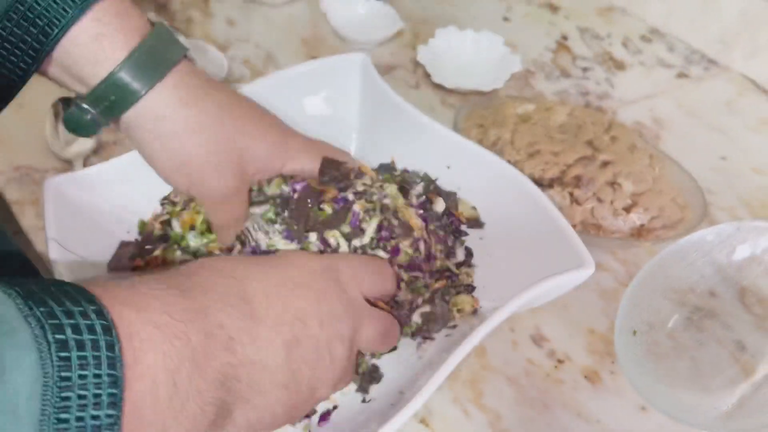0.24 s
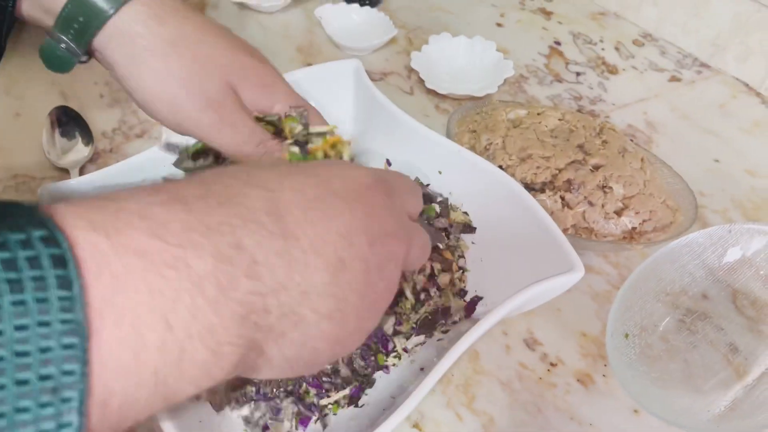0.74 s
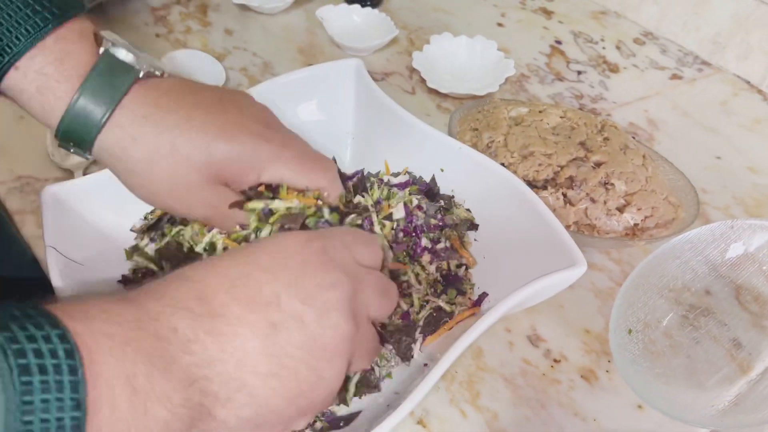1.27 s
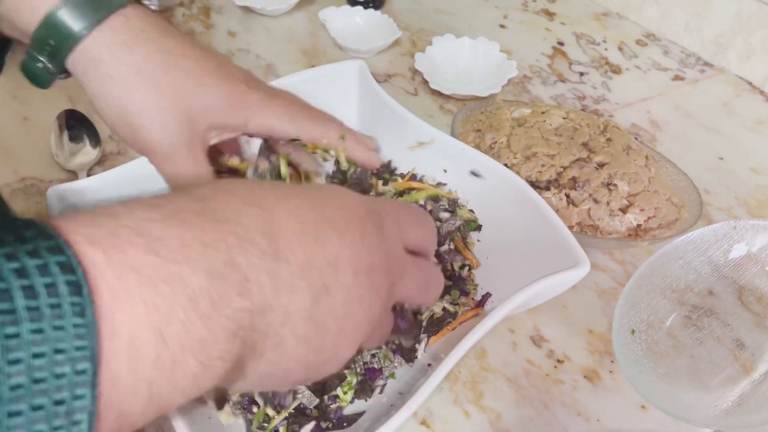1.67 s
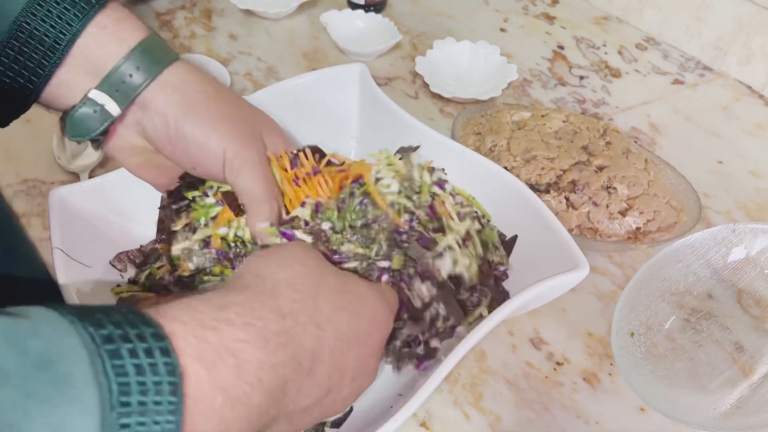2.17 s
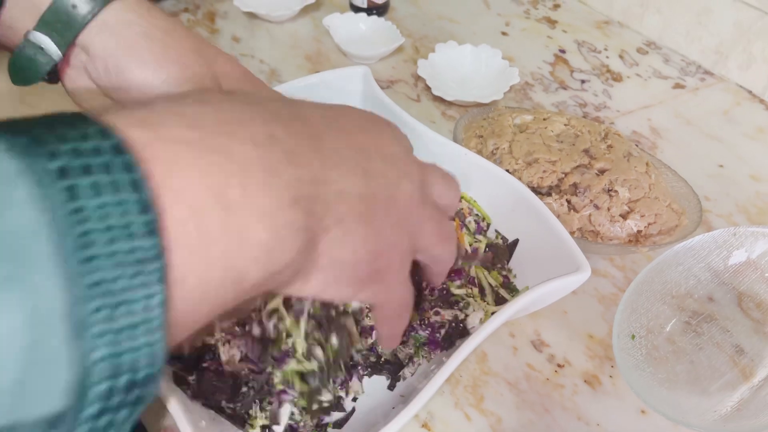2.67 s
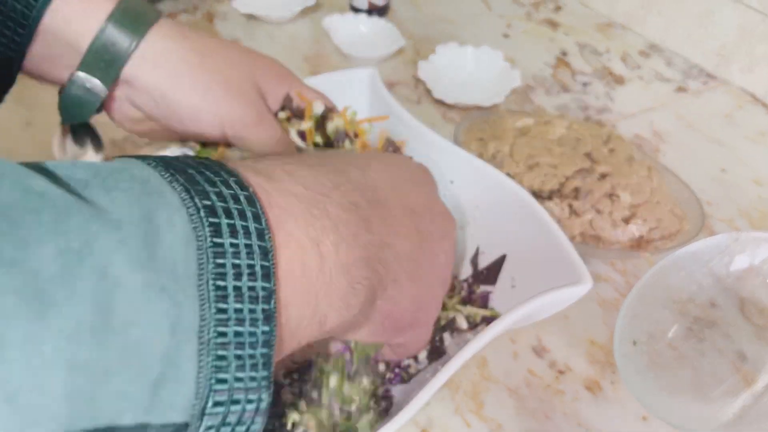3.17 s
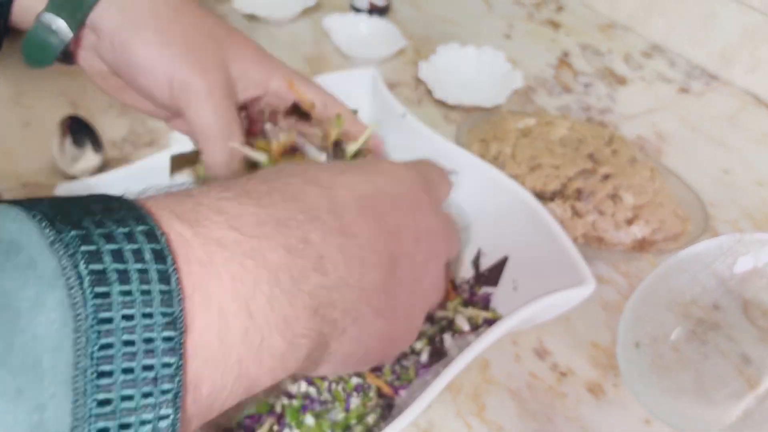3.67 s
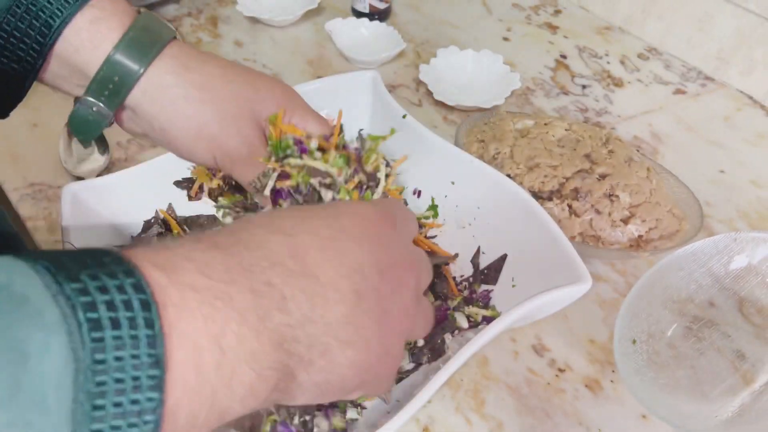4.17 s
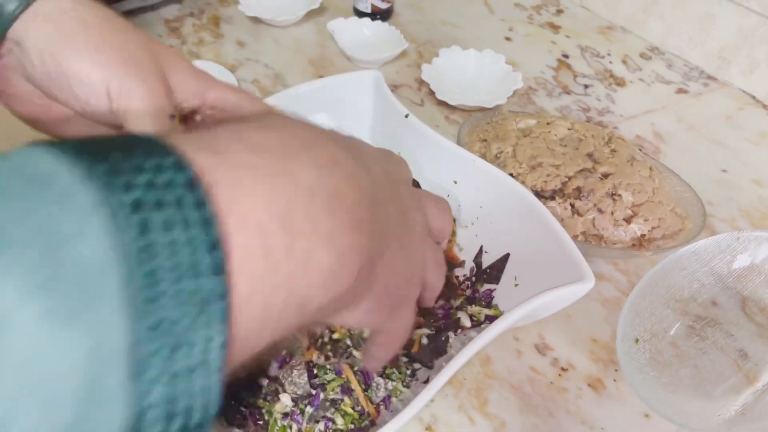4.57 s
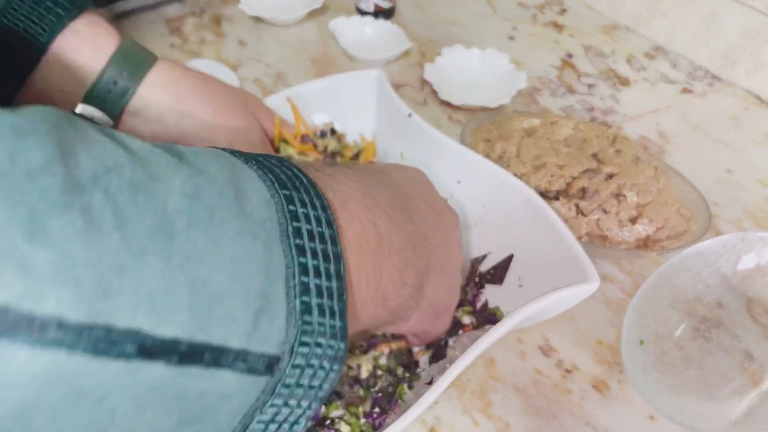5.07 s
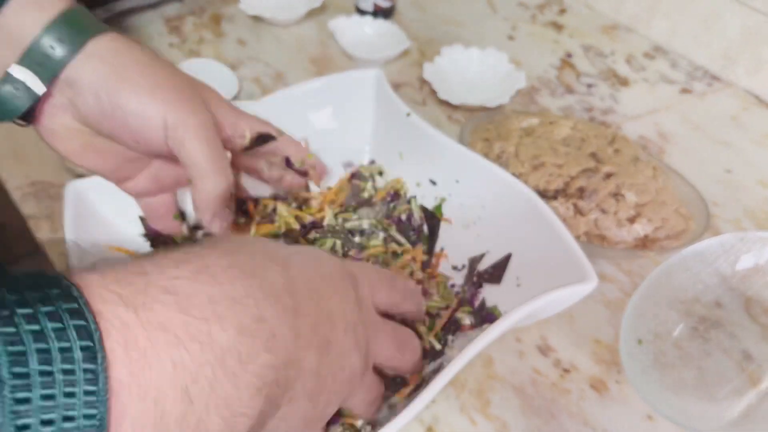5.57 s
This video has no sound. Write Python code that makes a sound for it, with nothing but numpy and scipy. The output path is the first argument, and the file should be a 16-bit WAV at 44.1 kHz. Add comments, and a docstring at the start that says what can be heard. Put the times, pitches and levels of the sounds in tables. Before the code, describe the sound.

Hands toss shredded raw vegetables in a large ceramic bowl, with soft crisp rustling and dull bowl knocks booming on a kitchen counter.

```python
"""A brush of shredded vegetables over the dying boom of an earlier knock comes first, then hands toss them
in a large ceramic bowl. It rocks on its foot: landings ring modes of counter and bowl and boom into the kitchen.
The rim clinks once and is softly tapped; a wet finger squeaks faintly on the glaze.
Rustle, shuffle and rumble are coloured noise that follows the hands; snapping shreds are short noise cracks.
A pair of small microphones hears it, alike in the bass and in a resonant treble band."""
import sys
import numpy as np
from scipy import signal
from scipy.fft import rfft, irfft, next_fast_len
from scipy.io import wavfile

SR = 44100
rng = np.random.default_rng(int(sys.argv[2]) if len(sys.argv) > 2 else 0)


def wav_record(signal):
    """Record a signal, one row per channel, as 16-bit PCM in the file named by sys.argv[1]."""
    frames = np.transpose(np.atleast_2d(signal))
    bounded = np.clip(frames, -1, 1)
    # unit amplitude maps onto the largest positive 16-bit level
    quanta = np.round(bounded * 32767).astype(np.int16)
    wavfile.write(sys.argv[1], SR, quanta)


def ratio_of_db(decibels):
    """Turn decibels (scalar or array-like) into linear amplitude factors; 0 dB maps to 1."""
    return 10 ** (np.asarray(decibels, float) / 20)


N = 256662   # length [samples]


def rms_one(x):
    """Scale to rms 1."""
    return x / np.sqrt(np.mean(x ** 2) + 1e-20)


def at_hz(points, hz):
    """Read a curve on a log-frequency axis."""
    points = np.array(points)
    return np.interp(np.log(hz + 1), np.log(points[:, 0] + 1), points[:, 1])


def coloured(x, spectrum):
    """Give a steady texture its spectrum; rms 1."""
    hz = np.arange(N // 2 + 1) * SR / N
    return rms_one(irfft(rfft(x) * ratio_of_db(at_hz(spectrum, hz)), N))


def drift(rate_hz):
    """Slow chance of spread 1: noise through two equal one-pole low-passes, made at every 40th sample."""
    r = np.exp(-80 * np.pi * rate_hz / SR)
    white = rng.standard_normal(N // 40 + 2002)
    slow = signal.lfilter([1], [1, -2 * r, r * r], white)[2000:]
    return np.interp(np.arange(N) / 40, np.arange(len(slow)), rms_one(slow))


def ring(clicks, hz, t60):
    """A unit click sets a sine of height 1 ringing; it falls 60 dB in t60 seconds."""
    r, w = ratio_of_db(-60 / (t60 * SR)), 2 * np.pi * hz / SR
    return signal.lfilter([0, np.sin(w)], [1, -2 * r * np.cos(w), r * r], clicks + 1e-18)


def dying(energy, t60):
    """Energy that falls 60 dB in t60 seconds."""
    return signal.lfilter([1], [1, -ratio_of_db(-120 / (t60 * SR))], energy)


def strike(at, heights):
    """Click train: heights at sample positions."""
    clicks = np.zeros(N)
    np.add.at(clicks, at.ravel(), heights.ravel())
    return clicks


def half_octaves():
    """(centre [Hz], band-pass) from the boom to the treble."""
    edges = 40 * 2 ** np.arange(0, 8.6, .5)
    return [(np.sqrt(low * high), signal.butter(2, [low, high], "band", fs=SR, output="sos"))
            for low, high in zip(edges, edges[1:])]


# The hands at work; only the swing of the pressure about its mean is used:
# (time [s], stirring of the shreds [relative dB], pressure on the bowl [relative dB])
TOSSING = [(0.0, -54.5, -52), (.31, -58, -64), (.52, -62.5, -56.5), (.82, -62.5, -58.5), (1.06, -55.5, -63),
           (1.2, -63.5, -71.5), (1.4, -67, -61.5), (1.62, -63, -56), (1.7, -56.5, -56), (1.95, -60, -55.5),
           (2.25, -69.5, -58), (2.46, -68, -65.5), (2.66, -56, -57), (3.0, -65, -49.5), (3.25, -64, -56),
           (3.35, -59.5, -49), (3.45, -64.5, -61.5), (3.55, -66.5, -58), (3.7, -59, -55.5),
           (3.89, -59, -55.5), (4.0, -68, -68), (4.15, -62.5, -63.5), (4.3, -65, -56.5), (4.55, -64, -57),
           (5.0, -66, -67.5), (5.28, -66.5, -55), (5.56, -59, -57), (5.82, -65.5, -54)]


def tossing():
    """Stirring level and swing in hand pressure [dB], drawn out sample by sample."""
    s, stir_db, press_db = np.transpose(TOSSING)
    t = np.arange(N) / SR
    press_db = np.interp(t, s, press_db)
    return np.interp(t, s, stir_db), press_db - press_db.mean()


# The heap slides after a knock; rows are rustle, shuffle, rumble:
# (peak level against the knock [dB], time to swell [s])
HEAP_SETTLING = [(-41, 0.062), (-33, 0.046), (-24.5, 0.052)]


def heap_gain(steady_db, layer):
    """Power of the tossing plus what each knock shakes loose: it peaks after the swell time, then fades."""
    level_db, swell_s = HEAP_SETTLING[layer]
    s, _, knock_db = np.transpose(KNOCKS)[:3]
    r = np.exp(-1 / (swell_s * SR))
    shaken = strike((s * SR).astype(int), ratio_of_db(2 * (knock_db + level_db))) + 1e-18
    loose = signal.lfilter([np.e * (1 - r)], [1, -2 * r, r * r], shaken)
    return np.sqrt(ratio_of_db(2 * steady_db) + loose)


# Spectrum of the low rumble: (frequency [Hz], relative density [dB per Hz])
RUMBLE_COLOUR = [(18, -43), (30, -29), (49, -1.5), (81, -1), (150, -3.5), (214, -11), (294, -5),
                 (395, -11.5), (500, -6), (650, -45), (1100, -120)]


def rumble(swing_db):
    """The pressed bowl rumbles: unsteady low noise that follows a share of the swing in pressure."""
    unsteady = rng.standard_normal((2, N)) * ratio_of_db(4.5 * drift(8))
    return heap_gain(-59.5 + 0.38 * swing_db, layer=2) * coloured(unsteady, RUMBLE_COLOUR)


def shreds(median_per_s, spread_db, smooth, flutter_db):
    """Countless tiny breaks and slips in clumps, on the smoother hiss that the room makes of them."""
    sizes = ratio_of_db(spread_db * np.minimum(rng.exponential(1, (2, N)), 5)) * rng.choice([-1, 1], (2, N))
    born = rng.random(N) < median_per_s * ratio_of_db(5 * drift(20)) / SR
    grains = rms_one(sizes * born) + smooth * rng.standard_normal((2, N))
    return grains * ratio_of_db(flutter_db * (drift(12.3) + drift(9.6)))


# Spectrum of the shuffling heap: (frequency [Hz], relative density [dB per Hz])
SHUFFLE_COLOUR = [(180, -45.5), (300, -2.5), (541, -19), (795, -3), (1100, -9), (1210, -6.5), (1430, -13),
                  (2150, -8.5), (2580, -18), (4500, -26.5), (5850, -50), (9900, -120)]


def shuffle(swing_db):
    """The heap shuffles in the bowl: mid-range grains that follow the swing in pressure."""
    grains = shreds(median_per_s=540, spread_db=2.0, smooth=2.0, flutter_db=2.5)
    return heap_gain(-58.5 + 1.05 * swing_db, layer=1) * coloured(grains, SHUFFLE_COLOUR)


# Spectrum of the rustling shreds: (frequency [Hz], relative density [dB per Hz])
RUSTLE_COLOUR = [(1470, -33.5), (2500, -2), (2910, -2), (3300, -3.5), (4440, -1.5), (7200, -7.5),
                 (9110, -2.5), (10000, -1), (11300, -3), (13100, -24)]


def rustle(stir_db):
    """Stirred shreds rub and rustle: dense bright grains that follow the stirring."""
    grains = shreds(median_per_s=1800, spread_db=0.5, smooth=0.91, flutter_db=0.78)
    return heap_gain(stir_db + 5.5, layer=0) * coloured(grains, RUSTLE_COLOUR)


# A wet finger slips on the glaze:
# (time [s], length [s], start frequency [Hz], rise [Hz per s], level before the room [dB])
FINGER_SLIPS = [(1.355, 0.16, 4540, 1200, -75), (1.526, .08, 4540, 2980, -70), (1.615, .05, 4640, 500, -74)]


def squeak(wobble_hz):
    """A finger slips on the glaze: faint wavering sines that swell, climb and fade."""
    t, out = np.arange(N) / SR, 0
    wobble, flutter = wobble_hz * drift(38), ratio_of_db(3 * drift(30))
    for s, length, hz, rise, level_db in FINGER_SLIPS:
        since = np.clip(t - s, 0, length)
        swell = np.sqrt(np.abs(np.sin(np.pi * since / length)))
        cycles = np.cumsum(hz + rise * since + wobble) / SR
        out = out + ratio_of_db(level_db) * swell * np.sin(2 * np.pi * cycles)
    return np.sqrt(2) * flutter * out


# Shreds that snap: (time [s], peak before the microphones [dB], centre frequency [Hz])
SHRED_SNAPS = [(0.274, -32, 8890), (0.312, -26.5, 11300), (0.5423, -36, 11500), (1.098, -29.5, 11200),
               (1.222, -37, 8460), (1.2974, -46, 8930), (1.4666, -41, 3480), (2.365, -36.5, 11400),
               (3.2858, -65, 11100), (3.7344, -58, 4790), (4.049, -39, 11600), (4.4357, -42, 4630),
               (5.1227, -54, 10900)]


def snaps(decay_s, width):
    """A crisp shred breaks: a crack of noise some milliseconds long, around its centre frequency."""
    out, t = np.zeros((2, N)), np.arange(600) / SR
    for s, peak_db, hz in SHRED_SNAPS:
        edges = [hz / width, min(hz * width, .45 * SR)]
        band = signal.butter(1, edges, "band", fs=SR, output="sos")
        crack = signal.sosfilt(band, rng.standard_normal((2, 600)) * np.exp(-t / decay_s))
        start = round(s * SR)
        out[:, start:start + 600] += ratio_of_db(peak_db) * crack / np.abs(crack).max()
    return out


def contacts(times, spread_s, count):
    """A chatter of uneven touches, weaker on average, within some milliseconds; one row a blow."""
    draw = rng.random((len(times), 2, count))
    order = np.arange(count)
    lag = spread_s * (order + draw[:, 0] * (order > 0)) / count
    at = np.minimum((np.array(times)[:, None] + lag) * SR, N - 1).astype(int)
    return at, (.5 + draw[:, 1]) * 0.85 ** order / np.sqrt(count)


CLINK_S, CLINK_DB = 4.758, -20.5   # the one hard clink: time [s], level before the room [dB]
# Modes of the thin rim: (frequency [Hz], relative level [dB], t60 [s])
RIM_MODES = [(1717, -7.5, 0.056), (2330, -5, 0.11), (2680, -15.5, .05), (2940, -5, 0.049), (3136, -1, 0.09),
             (3634, -3.5, 0.06), (4000, -17.5, .1), (4120, -2.5, 0.049), (4736, -13.5, 0.078),
             (5400, -19, 0.027), (5700, -23.5, 0.1), (5920, -11.5, 0.26), (6218, -18.5, .08),
             (6400, -9.5, 0.062), (7520, -24.5, 0.036), (9260, -20, 0.037), (10900, -13, 0.037)]
# Fingers and shreds that tap the bowl:
# (time [s], level before the room [dB], frequency of the modes stirred most [Hz])
BOWL_TAPS = [(2.664, -56, 3390), (3.215, -46.5, 2970), (3.312, -36, 2270), (3.67, -39, 3000),
             (4.249, -55, 2300), (4.34, -43.5, 2250), (5.301, -51, 2320), (5.534, -59, 2280)]


def rim(burst_s, crack_db, narrow_db):
    """A hard clink chatters, cracks and rings all of the thin rim; soft taps stir only a few modes."""
    times, levels_db, centres_hz = np.transpose([(CLINK_S, CLINK_DB, 1)] + BOWL_TAPS)
    at, touch = contacts(times, spread_s=burst_s, count=7)
    touch = touch * rng.choice([-1, 1], touch.shape)
    soft = np.arange(len(times)) > 0
    crack = signal.butter(1, [1800, 6000], "band", fs=SR, output="sos")
    out = signal.sosfilt(crack, strike(at[0], touch[0] * ratio_of_db(CLINK_DB + crack_db)))
    first = np.where(np.arange(7) > 0, .2, 1)      # later touches add little to the ring
    for hz, mode_db, t60 in RIM_MODES:
        octaves_off = abs(np.log2(hz / centres_hz))
        stirred_db = levels_db + mode_db - narrow_db * soft * octaves_off
        out += ring(strike(at, touch * first * ratio_of_db(stirred_db)[:, None]), hz, t60)
    return out


# Dying of the room: (frequency [Hz], t60 [s])
ROOM_TAIL = [(50, 1), (130, 0.56), (350, 0.66), (920, 0.47), (2430, 0.4), (6000, 0.28), (11000, .1)]


def kitchen(x, early_db, early_t60, late_db):
    """Direct sound, strong close reflections that die fast, then a tail that dies band by band."""
    t, size = np.arange(SR) / SR, next_fast_len(N + SR)
    white, reply = rng.standard_normal((2, 2, SR)), 0
    for k, (hz, band) in enumerate(half_octaves()):
        late = ratio_of_db(late_db - 60 * t / at_hz(ROOM_TAIL, hz))
        early = ratio_of_db(early_db - 60 * t / early_t60)
        reply = reply + signal.sosfilt(band, white[k % 2]) * (late + early) * (t > .002)
    reply[0, 0] += 1.2   # direct sound, in the shared field only
    return irfft(rfft(x, size) * rfft(reply, size), size)[:, :N]


# Foot of the bowl on the counter; the row at 0 stands for the dying boom of an earlier knock:
# (time of first touch [s], time until the full weight lands [s],
# relative level [dB], extra boom before its share [dB], extra sharpness before its share [dB])
KNOCKS = [(0.0, 0.0047, -58.5, 15.5, 8), (.083, 0.0063, -25, 1, 2), (.838, 0.0045, -29, 0, -2),
          (.912, .0066, -18, 0.5, 5), (1.712, 0.019, -30.5, 3.5, -2), (1.805, 0.0069, -33, 5.5, 2.5),
          (2.112, 0.0055, -25.5, 1.2, 1), (2.704, 0.0098, -17, 0, 7.5), (3.342, 0.0047, -63.5, 3.5, 15),
          (3.648, .006, -61, 5.5, 11), (4.633, 0.0073, -14.5, -2.5, 3), (4.863, 0.0067, -23, 2.5, 2),
          (5.641, 0.0064, -20.5, 0.7, 3.5)]
# What every knock stirs: (frequency [Hz], level [dB], share of the boom [-], share of the sharpness [-])
KNOCK_REACH = [(90.4, -12, 1.1, 0), (302, -5, 1.37, 0.24), (610, 1.33, 0.014, 0.14), (1100, 0.6, 0, 0.41),
               (2020, -10.5, 0, 1.54), (2900, -8.5, 0.098, 1.7), (5000, -5.5, 0.16, 1.5)]
# Modes of counter and bowl: (frequency [Hz], relative level [dB], t60 [s])
BODY_MODES = [(61.6, -5, 0.8), (82.9, -18, 0.16), (100.6, -1, 0.97), (154, -10, 0.4), (235, -3, 0.057),
              (259.8, -0.5, 0.38), (297.7, 1, 0.44), (474.5, -6.5, 0.039), (608, -6, 0.12),
              (690, -0.5, 0.03), (757, -14, 0.093), (963, -0.5, 0.033), (1221, -3.5, 0.27),
              (1408.5, -1, 0.018), (1764, -6.5, 0.26), (2203, 4.5, 0.11), (2300, -2, 0.031),
              (2826, -3.5, 0.13), (2761, 0, 0.094), (2899, -3, 0.12), (3610, -23.5, 0.16),
              (3760, -17.5, 0.098), (4160, -18.5, 0.04), (4880, -22.5, 0.021)]
# The bare contact, also the floor under the echoed modes: (frequency [Hz], relative level [dB])
CONTACT_COLOUR = [(40, -35.5), (60, -28), (200, -5.5), (280, 0.5), (385, -3), (500, -4), (800, 2),
                  (1400, -12.5), (2300, -6), (3200, -16), (4500, -37.5), (7000, -36.5)]


def knock_strength(rows, hz):
    """Level [dB] of first touch, landing and bounce: the loaded foot lands softer above 700 Hz."""
    reach = np.array(KNOCK_REACH)
    stirred = [[at_hz(reach[:, [0, k]], hz)] for k in range(1, 4)]
    dull_db = 3.5 * max(np.log2(hz / 700), 0)   # 3.5 dB per octave
    return rows[:, 2:3] - np.array([0, 1, 1]) * dull_db + np.c_[np.ones(len(rows)), rows[:, 3:]] @ stirred


def knocks(mode_db, contact_db, bounce_s, early_db, early_t60, late_db, held_db, held_hz):
    """First touch, full weight, a small bounce: modes ring over the bang of the contact and the room answers."""
    rows = np.array(KNOCKS)
    draw = rng.random((len(rows), 2))
    landed = rows[:, 0] + rows[:, 1]
    at = (np.c_[rows[:, 0], landed, landed + bounce_s * (.3 + draw[:, 0])] * SR).astype(int)
    # first touch against the full weight: weaker for hard knocks, stronger for slow landings
    first_db = -4.5 - .5 * np.maximum(rows[:, 2] + 22, -8) + 510 * np.minimum(rows[:, 1] - .006, .006)
    touch = np.c_[ratio_of_db(first_db), np.ones(len(rows)), .12 + .2 * draw[:, 1]]
    out, f = np.zeros((2, N)), np.arange(N // 2 + 1) * SR / N
    power = ratio_of_db(2 * at_hz(CONTACT_COLOUR, f))
    for hz, level_db, t60 in BODY_MODES:
        vary_db = rng.normal(0, 2.5, (len(rows), 1))
        heights = touch * ratio_of_db(knock_strength(rows, hz) + level_db + mode_db + vary_db)
        blows = strike(at, heights) * rng.choice([-1, 1])
        out[0] += ring(blows, hz, t60)
        if hz < 350:   # the heavy counter builds up: a shorter ring is taken away
            out[0] -= ring(blows, hz, min(22 / hz, 0.46 * t60))
        # the many echoes keep the mode as a rough, beating band
        off = (f - hz) / (held_hz + 1.31 / t60)
        power += ratio_of_db(2 * (level_db + held_db)) / (1 + off ** 2) ** 2
    echoes = irfft(rfft(rng.standard_normal((2, N))) * np.sqrt(power), N)
    for hz, band in half_octaves()[:16]:
        blows = strike(at, touch * ratio_of_db(knock_strength(rows, hz))) + 1e-18
        out[0] += signal.sosfilt(band, blows) * ratio_of_db(at_hz(CONTACT_COLOUR, hz) + contact_db) * SR / hz
        early = ratio_of_db(2 * early_db) * dying(blows ** 2, early_t60)
        late = ratio_of_db(2 * late_db) * dying(blows ** 2, at_hz(ROOM_TAIL, hz))
        build = np.exp(-hz / 1.5 / SR)      # lows take longer to build up
        energy = signal.lfilter([1 - build], [1, -build], early + late)
        out += signal.sosfilt(band, echoes) * np.sqrt(energy * SR / hz)
    # the loaded foot lands softly: little treble
    return signal.sosfilt(signal.butter(4, 6500, fs=SR, output="sos"), out)


def scene():
    """Two sound fields: row 0 is what both microphone ports share, row 1 what sets them apart."""
    stir_db, swing_db = tossing()
    heap = rustle(stir_db) + shuffle(swing_db) + rumble(swing_db)
    foot = knocks(mode_db=-7.0, contact_db=3, bounce_s=.006, early_db=6, early_t60=0.037,
                  late_db=-4.5, held_db=10, held_hz=4.9)
    bowl = rim(burst_s=.013, crack_db=15.5, narrow_db=28.5) + squeak(wobble_hz=25.0)
    bowl = kitchen(bowl, early_db=-19.0, early_t60=0.047, late_db=-28.5)
    return heap + foot + bowl + snaps(decay_s=0.0021, width=2.1)


# How alike the two ports hear: (frequency [Hz], likeness [0-1])
LIKENESS = [(60, 0.97), (300, 0.77), (600, 0.14), (1500, 0.32), (3000, 0.27), (5000, 0), (8000, 0.02),
            (8800, 0.14)]
# The same in the band of the port resonances: (frequency [Hz], likeness [0-1])
PORT_LIKENESS = [(9700, .995), (10500, .995), (11300, .87), (12100, .97)]
# The left port is nearer; in the high treble the port resonances turn the phase back:
# (frequency [Hz], lead of the left [cycles])
LEFT_LEADS = [(0, 0), (1200, .03), (2240, .38), (4300, 1.0), (8600, 2.0), (9750, 1.52), (10450, 1.48),
              (11800, 1.0)]
# Left against right: (frequency [Hz], level difference [dB])
LEFT_LOUDER = [(100, 0), (400, 2.5), (1200, 1.5), (2200, -2.5), (3500, -2), (6000, 7), (8000, -0.5),
               (8800, 1.5)]
# Resonance and roll-off of the ports: (frequency [Hz], gain [dB])
PORT_COLOUR = [(9000, -0.5), (11300, 4.5), (12100, 0.5), (12700, -24.5), (13300, -45.5)]


def microphones(dry):
    """The ports share part of what they hear; level and phase differences are split between the two."""
    size = next_fast_len(N + 4096)
    hz = np.arange(size // 2 + 1) * SR / size
    alike = np.clip(at_hz(LIKENESS + PORT_LIKENESS, hz), 0, 1)
    shares = np.sqrt([(1 + alike) / 2, (1 - alike) / 2])
    mid, side = rfft(dry, size) * ratio_of_db(at_hz(PORT_COLOUR, hz)) * shares
    lead = np.interp(hz, *np.transpose(LEFT_LEADS))
    half = ratio_of_db(at_hz(LEFT_LOUDER, hz) / 2) * np.exp(1j * np.pi * lead)
    return irfft([(mid + side) * half, (mid - side) / half], size)[:, :N]


def top_cut(x):
    """Nothing passes above the cut-off."""
    return signal.sosfilt(signal.butter(12, 13210, fs=SR, output="sos"), x)


def record(dry):
    """The microphone pair hears the scene; the deepest bass is cut and peaks are rounded."""
    ports = microphones(dry)
    ports = signal.sosfilt(signal.butter(6, 47, "high", fs=SR, output="sos"), ports)
    mix = 1.3 * np.tanh(ports / 1.3)
    return top_cut(mix)


dry = scene()
out = record(dry)
wav_record(out)
```